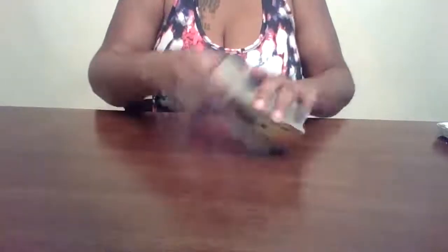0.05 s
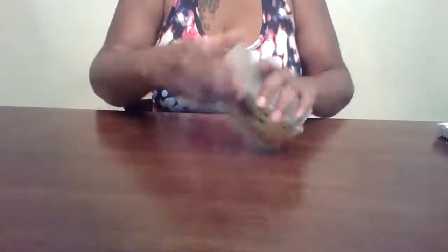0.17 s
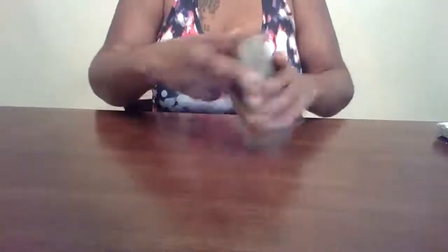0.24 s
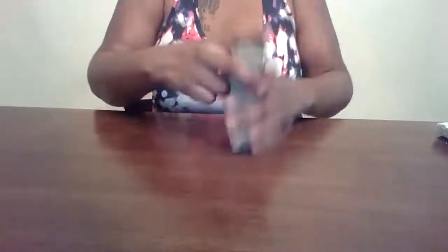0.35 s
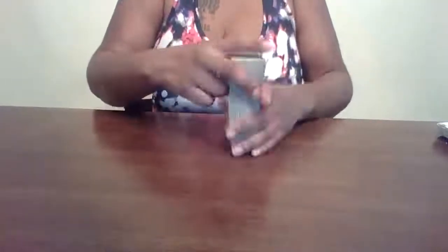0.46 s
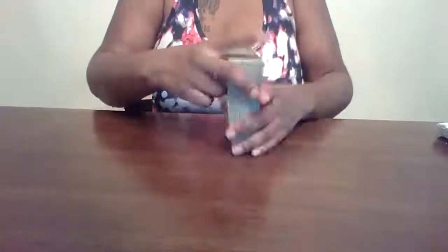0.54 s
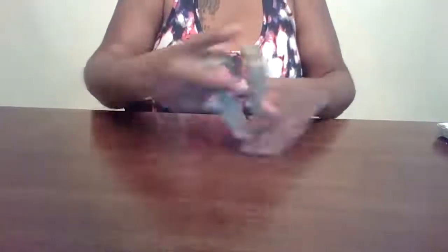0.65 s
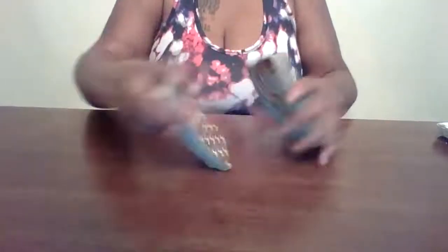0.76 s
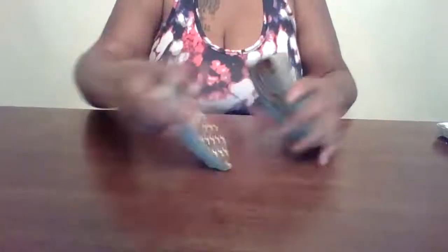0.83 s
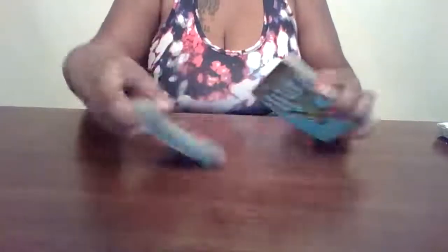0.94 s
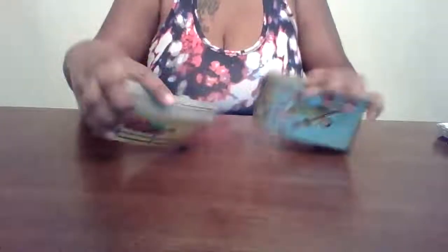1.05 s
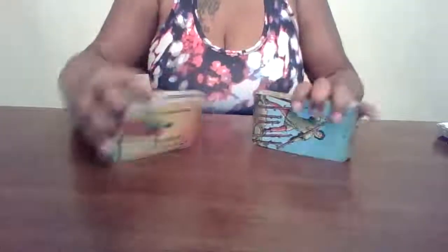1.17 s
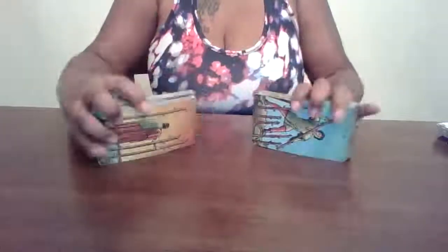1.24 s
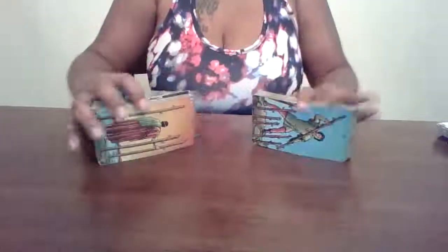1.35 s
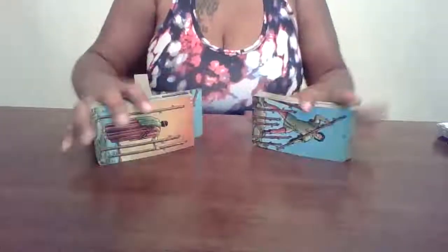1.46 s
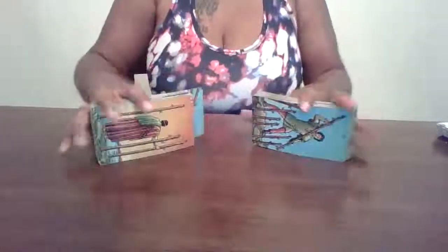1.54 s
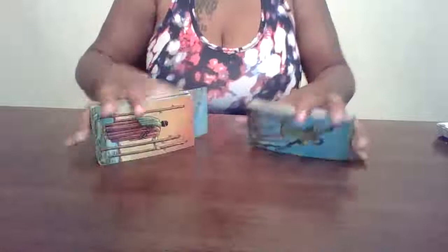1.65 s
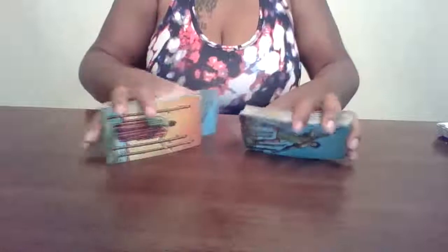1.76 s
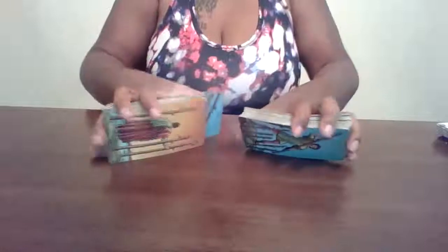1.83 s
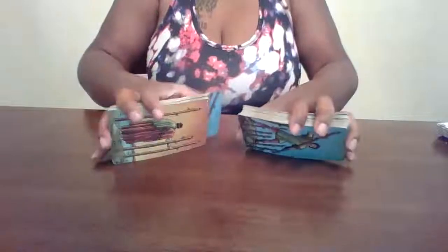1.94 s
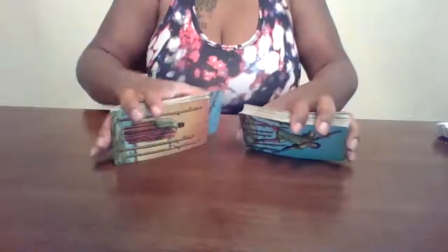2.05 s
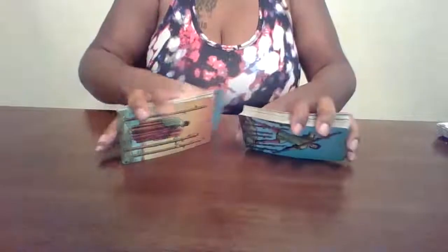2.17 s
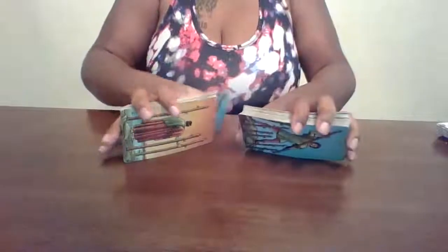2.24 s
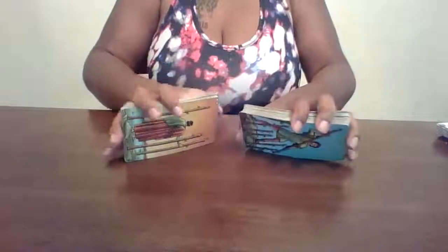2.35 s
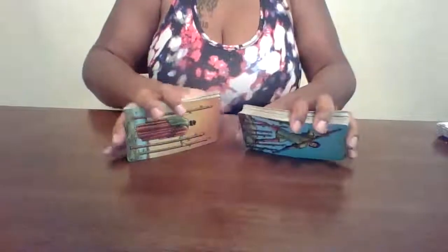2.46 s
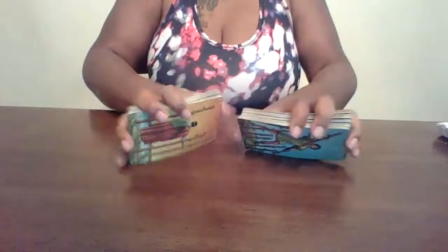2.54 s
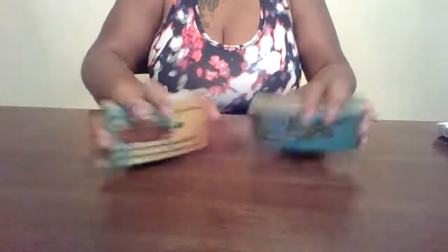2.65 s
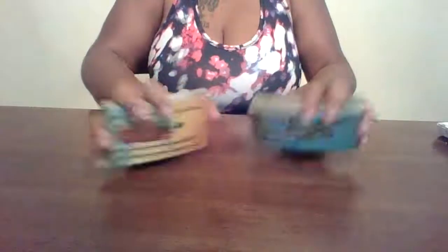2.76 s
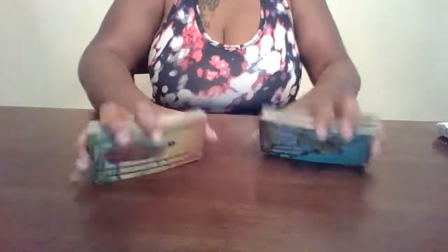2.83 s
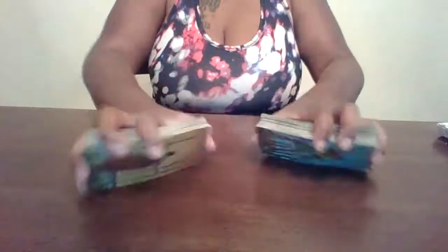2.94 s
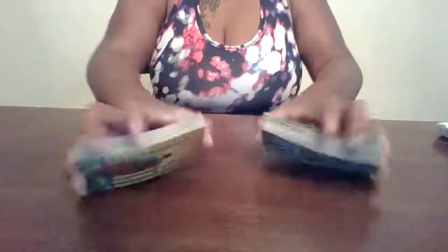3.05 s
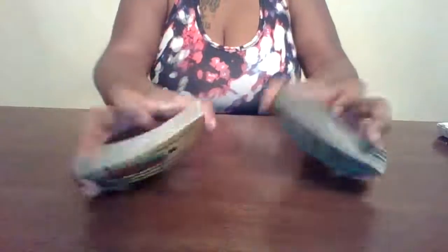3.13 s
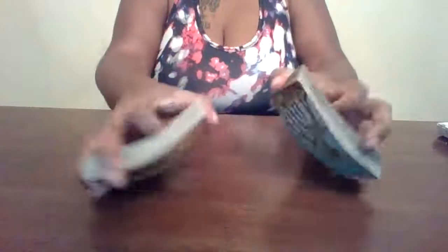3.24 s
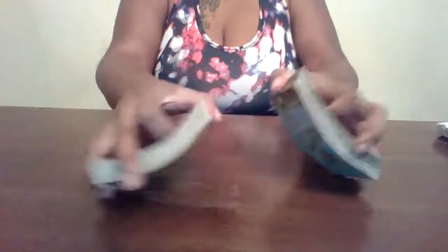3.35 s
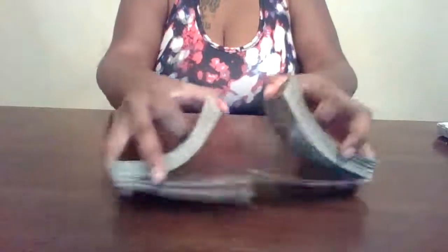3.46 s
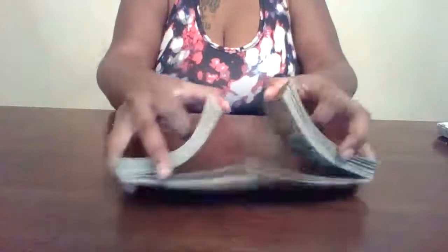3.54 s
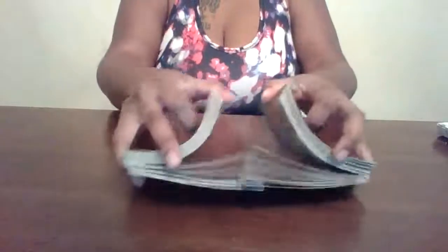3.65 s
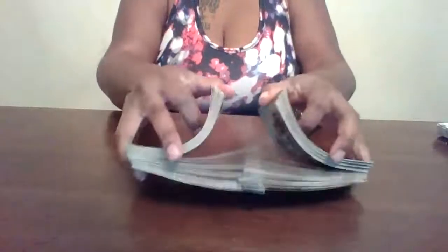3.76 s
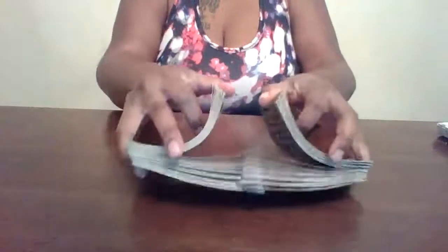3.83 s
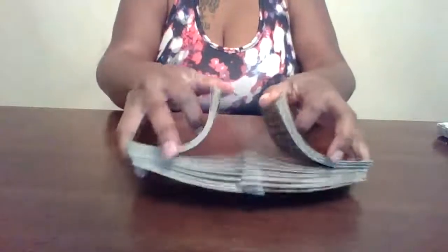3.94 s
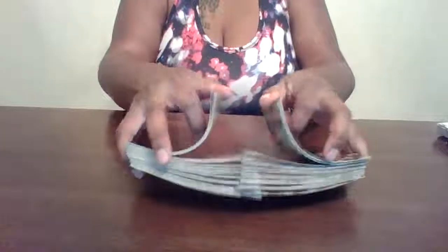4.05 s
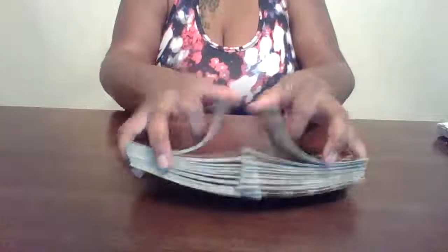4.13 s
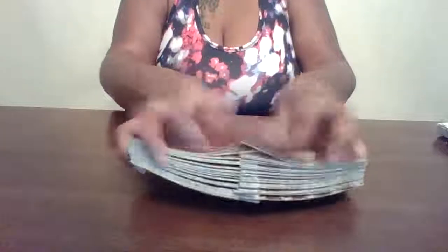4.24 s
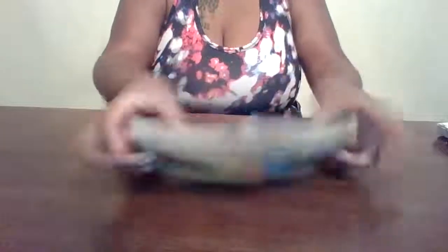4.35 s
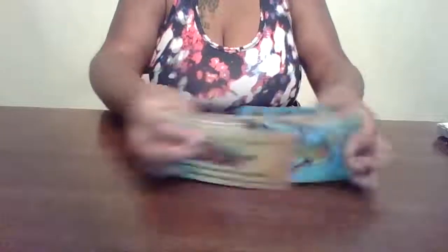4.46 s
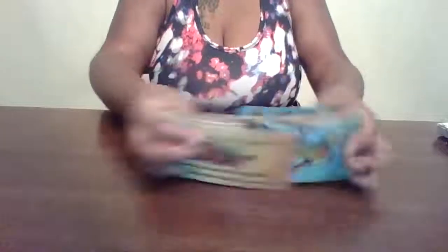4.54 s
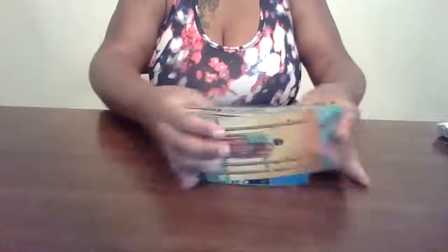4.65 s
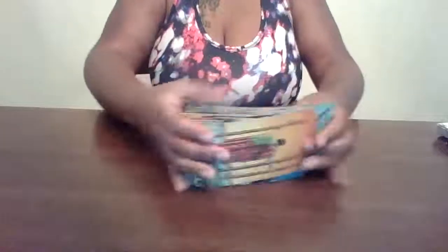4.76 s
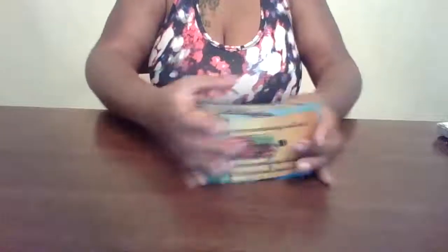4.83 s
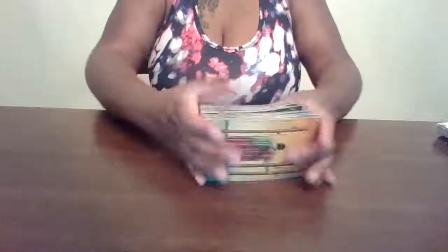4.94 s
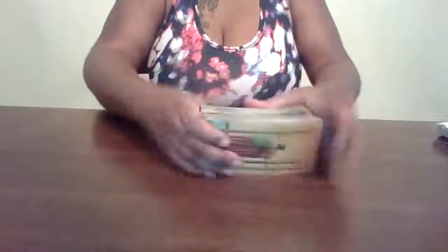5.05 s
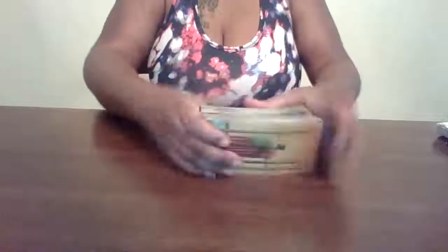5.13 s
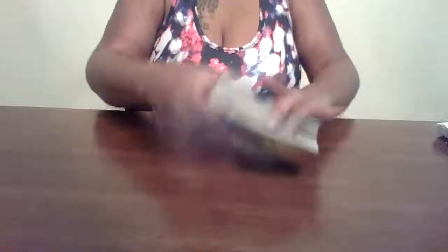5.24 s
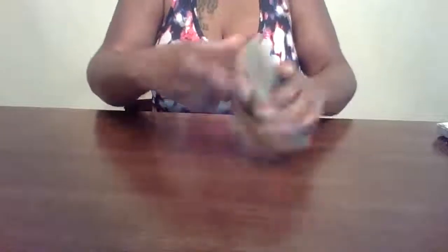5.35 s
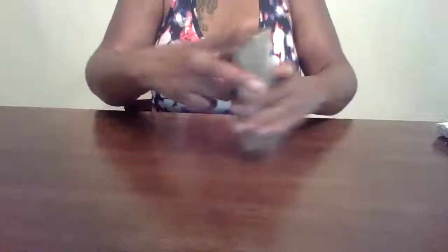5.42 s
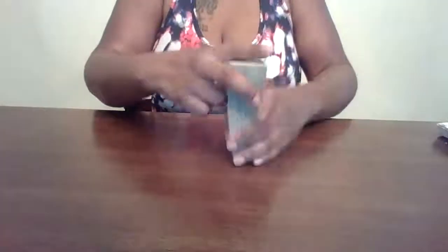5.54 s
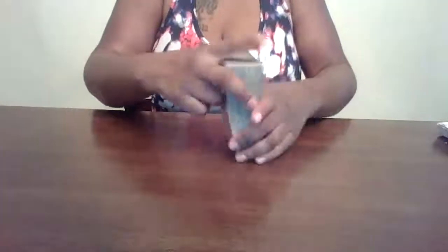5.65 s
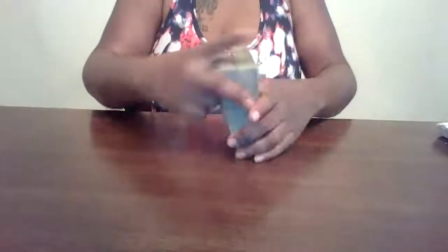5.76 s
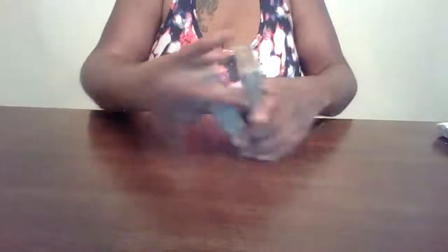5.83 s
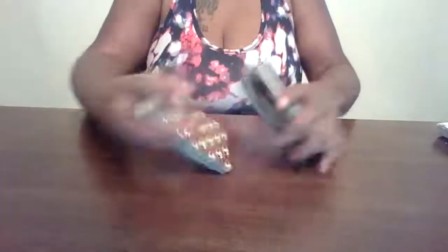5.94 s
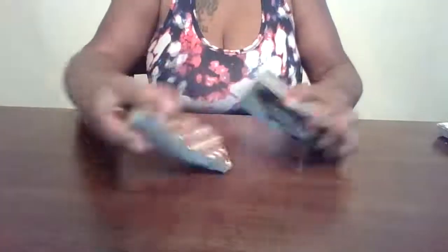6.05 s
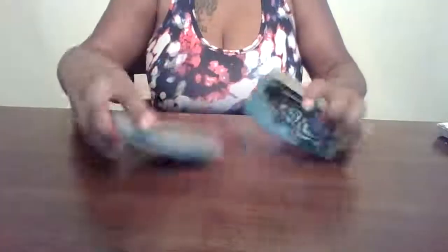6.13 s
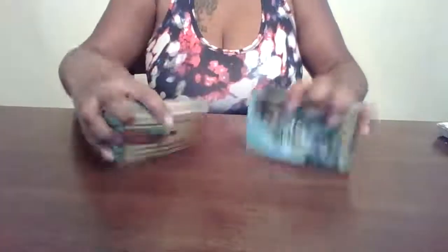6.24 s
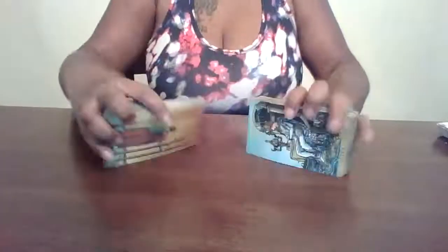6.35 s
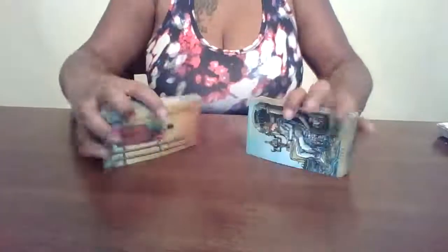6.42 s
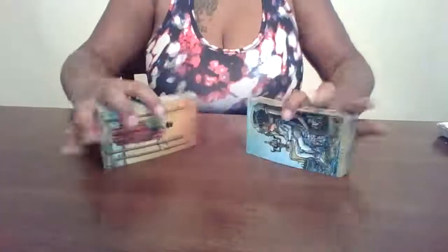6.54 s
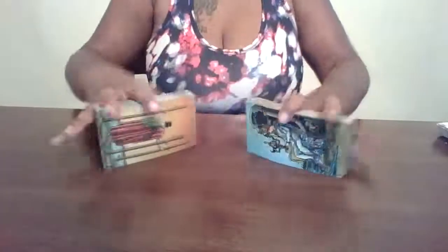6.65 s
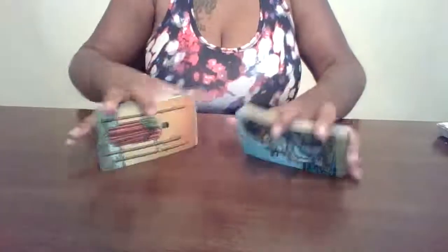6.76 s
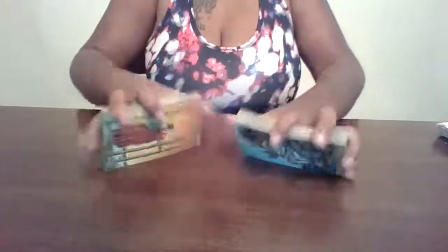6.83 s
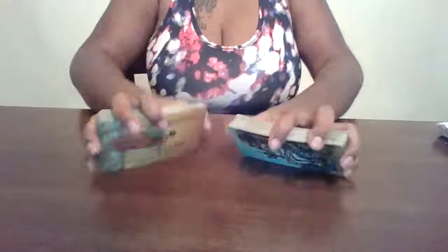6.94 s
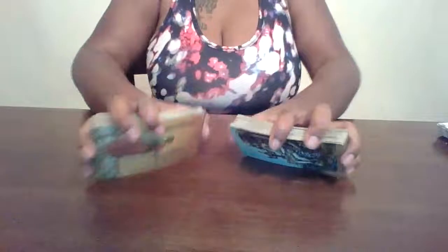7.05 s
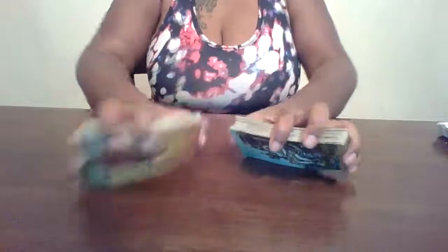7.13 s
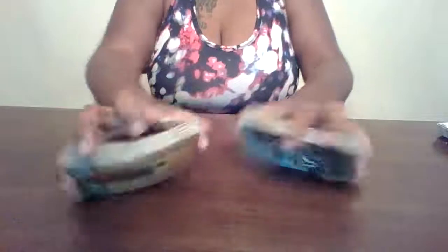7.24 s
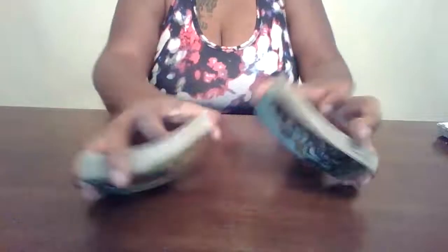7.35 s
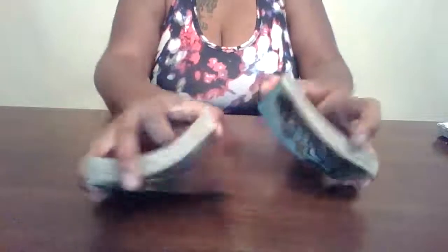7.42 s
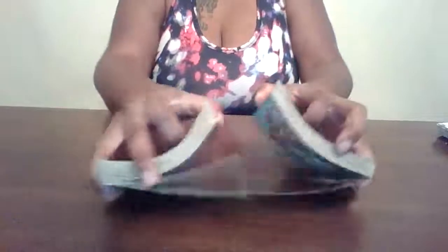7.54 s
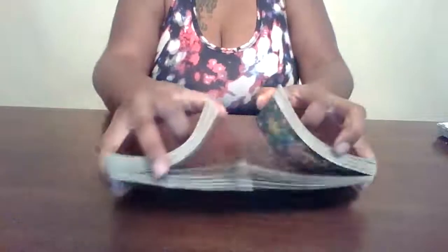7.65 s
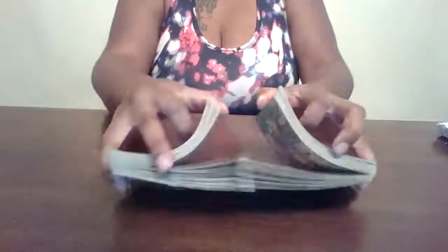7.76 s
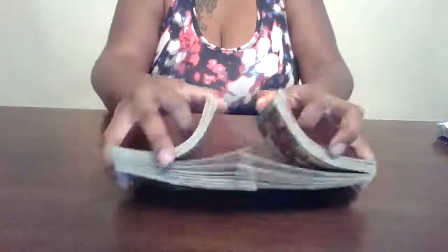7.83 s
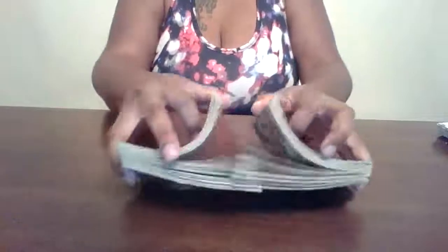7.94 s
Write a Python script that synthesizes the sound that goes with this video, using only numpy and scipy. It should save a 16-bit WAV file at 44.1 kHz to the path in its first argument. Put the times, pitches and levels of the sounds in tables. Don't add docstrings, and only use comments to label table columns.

```python
import sys
import numpy as np
from scipy import signal
from scipy.fft import rfft, irfft, next_fast_len
from scipy.io import wavfile
from scipy.ndimage import uniform_filter1d, minimum_filter1d

SR = 44100
rng = np.random.default_rng(int(sys.argv[2]) if len(sys.argv) > 2 else 0)


def put_to_file(sound):
    columns = np.atleast_2d(sound).T
    safe = np.clip(columns, -1, 1)
    whole_steps = np.round(safe * 32767)
    wavfile.write(sys.argv[1], SR, whole_steps.astype(np.int16))


def undo_db(level):
    steps = np.asarray(level, float) / 20
    return 10 ** steps


N = 352359

# start in seconds, slap level in dB,
# sharpness of the corner in dB, weight behind it in dB.
KNOCKS = [(0.3442, -22, -2.5, -0.5), (0.349, -25, -12, 0), (0.3553, -27.5, -2, 13.5), (0.7135, -61, -4, 19),
          (1.0763, -45, -17, 11.5), (1.1779, -35, -10, -1.5), (1.3883, -36, -16, -8),
          (1.3912, -24, -6.5, -12), (2.736, -35.5, -1.5, 8.5), (5.47, -13, -4.5, -16.5),
          (5.497, -28, 0.5, 11), (5.8802, -53.5, 11.5, 4), (6.269, -23.5, -7.5, 0.5),
          (6.292, -14.5, -11, -9), (6.441, -27.5, -24, -7), (6.4837, -34.5, -39, -17)]


def evened(x):
    return x / np.sqrt(np.mean(x ** 2) + 1e-20)


def read(points, hz):
    f, value = np.transpose(points)
    return np.interp(np.log(hz + 1), np.log(f + 1), value)


def follow(points):
    s, db = np.transpose(points)
    return undo_db(np.interp(np.arange(N) / SR, s, db, -120, -120))


def strokes(rows, steep_db):
    t = np.arange(N) / SR
    return sum(undo_db(db - steep_db * ((t - at) * 1000 / ms) ** 2) for at, db, ms, *_ in rows)


def colour(x, points):
    hz = abs(np.fft.fftfreq(4096, 1 / SR))
    log_gain = np.log(undo_db(np.maximum(read(points, hz), -100)))
    taps = np.fft.ifft(np.exp(np.conj(signal.hilbert(log_gain)))).real[:2048]
    return signal.oaconvolve(x, taps[None] / np.linalg.norm(taps), axes=1)[:, :N]


def resonate(x, hz, width):
    turn = np.exp(2j * np.pi * np.cumsum(hz * np.ones(x.shape[-1])) / SR)
    r = np.exp(-np.pi * width / SR)
    return 2 * (turn * signal.lfilter([1 - r], [1, -r], x / turn + 1e-18)).real


def noise(points, patchy_db, flicker_db):
    frames, hz = N // 128 + 5, np.fft.rfftfreq(512, 1 / SR)
    a, b, c, d, patches = rng.standard_normal((frames, len(hz), 5)).T
    patches = uniform_filter1d(patches, size=8, axis=0)
    patches = evened(uniform_filter1d(patches, size=14, axis=1))
    flicker = evened(uniform_filter1d(rng.standard_normal(frames), size=5))
    z = np.array([a + 1j * b, c + 1j * d]) * undo_db(patchy_db * patches + flicker_db * flicker)
    x = signal.istft(z, nperseg=512, noverlap=384)[1][:, :N]
    return evened(colour(x, points))


def contacts(rows, body, crack_hz, push_hz, rise, fizz_db, length_ms, dull_hz):
    s, slap_db, sharp_db, weight_db = np.transpose(rows)[:, :, None, None]
    crack_db, push_db = slap_db + sharp_db, slap_db + weight_db
    fizz_db = slap_db + fizz_db + 1.56 * sharp_db
    spread_db = 6.5 * np.clip(rng.standard_normal(s.shape), -2, .5)
    ms = length_ms * undo_db(spread_db - 0.41 * sharp_db)

    u = np.arange(1280) / SR / (np.maximum(ms, .3) / 1000)
    grit = rng.standard_normal((len(rows), 4, 3, u.shape[-1])).swapaxes(0, 1)
    grit = grit * np.exp(-u) * (1 - np.exp(-u / rise))
    grit = grit * (1 + 1.7 * np.exp(-u / 0.29))
    grit[:, :, 2] = signal.unit_impulse(u.shape[-1])
    crack, fizz, slap, push = grit

    crack = signal.sosfilt(signal.butter(2, [2900, crack_hz], "band", fs=SR, output="sos"), crack)
    fizz = signal.sosfilt(signal.butter(3, [7500, 16000], "band", fs=SR, output="sos"), fizz)
    modes = [undo_db(db) * resonate(resonate(slap, hz, width), hz, 3 * width) for hz, width, db in body]
    modes[0][:, 2] *= .25
    bend = sum(modes)
    puff = resonate(resonate(push, push_hz, 1500), push_hz, 1500)
    bend, puff = signal.sosfilt(signal.butter(3, dull_hz, fs=SR, output="sos"), [bend, puff])

    levels_db = crack_db - 6.0, fizz_db + 7.0, slap_db + 0.5, push_db + 6.0
    bursts = 0
    for layer, db in zip((crack, fizz, bend, puff), levels_db):
        layer = layer / np.linalg.norm(layer, axis=-1, keepdims=True)
        bursts = bursts + undo_db(db) * layer / abs(layer[:, :1]).max(-1, keepdims=True)
    out = np.zeros((3, N + u.shape[-1]))
    for at, burst in zip(np.round(s.ravel() * SR).astype(int) - 8, bursts):
        out[:, at:at + burst.shape[1]] += burst
    return out[:, :N]


def card_snaps():
    # start in seconds, slap level in dB, sharpness of the corner in dB,
    # weight of the card in dB.
    opening_riffle = [(3.2643, -47.5, 13, 0), (3.2896, -30.5, -1, 3.5), (3.2974, -27.5, 0.5, -5),
                      (3.3398, -41.5, -2, -15.5), (3.3487, -35.5, 5.5, 11), (3.3588, -43.5, -8.5, -1.5),
                      (3.366, -36, -1, 8), (3.374, -45, 11.5, 0.5), (3.3815, -44.5, 15, -6.5),
                      (3.3915, -22, 3, -7), (3.3962, -15.5, 7.5, -16), (3.4027, -9, -2, -11),
                      (3.4114, -24, 2, 6.5), (3.432, -33.5, 11, -11.5), (3.4704, -33.5, -8, -18.5),
                      (3.4842, -23, -5.5, -14), (3.4887, -24.5, 5.5, -6.5), (3.5034, -22.5, -2.5, -1.5),
                      (3.5308, -17.5, 2, -18.5), (3.5868, -47.5, 14, -9.5), (3.6177, -43.5, 2, -4.5),
                      (3.6322, -21.5, 5.5, -5),
                      (3.6619, -14.5, 4, -11.5), (3.671, -21, 11, -7), (3.6897, -21.5, 5.5, -4.5),
                (3.705, -21, 5.5, -5), (3.734, -52.5, 2.5, 8.5), (3.7464, -38, 8.5, 16),
                (3.768, -17, 9, -15.5), (3.7907, -18.5, 7.5, -5), (3.7996, -20, 15, -21),
                (3.8324, -13, 6.5, -25.5), (3.8686, -13.5, 6, -14.5), (3.891, -14, -3.5, -11),
                (3.8957, -24.5, -5.5, -22), (3.912, -40.5, 16.5, 2.5), (3.925, -11.5, 5, -23.5),
                (3.9371, -18, 6, 5.5), (3.9757, -35, 13, -7), (3.9841, -11, 12, -28),
                (3.9901, -26.5, 9, -11), (4.068, -14.5, 10, -36), (4.085, -13.5, 9, -24.5),
                (4.0928, -19, 11.5, -13.5), (4.1027, -11.5, 8.5, -5.5), (4.1193, -17.5, 6.5, -21)]
    second_riffle = [(7.29, -37.5, 0.5, 1), (7.353, -47.5, 20, 5), (7.3737, -44.5, -18, 4),
                     (7.4072, -49.5, 9.5, 3), (7.444, -44, 20.5, -2), (7.4606, -36.5, -7, 5),
                     (7.485, -61, 26, -0.5), (7.51, -43.5, 15, -13), (7.515, -26.5, 5, -3),
                     (7.5213, -20, -9, -8.5), (7.536, -27, -0.5, -1.5), (7.546, -30, 10.5, 2.5),
                     (7.565, -39, 13.5, -8), (7.5705, -19, 4.5, -11), (7.573, -11.5, -2.5, -16),
                     (7.577, -23, 3.5, -6), (7.581, -13, 4, -8.5), (7.628, -18, 7, -6),
                     (7.6627, -10.5, 5.5, -15), (7.717, -21.5, 11.5, -4.5), (7.7258, -23.5, 3, -14),
                     (7.7585, -16.5, -7, -10), (7.827, -38, 9, 7), (7.7687, -23.5, -7, -13),
                     (7.838, -14, -1.5, -9.5), (7.8485, -28, 11.5, 0.5), (7.851, -22.5, 0, 6),
                     (7.922, -54.5, 18.5, -7), (7.9339, -17.5, 0.5, -6.5), (7.9442, -15.5, -5, -7),
                     (7.9516, -11.5, 5.5, -11), (7.973, -13.5, 3, -12), (7.9854, -15, 5.5, -15)]
    # pitch in Hz, width in Hz, level in dB.
    bending = [(1560, 620, 9.5), (2060, 310, 2.5)]
    return contacts(opening_riffle + second_riffle, bending, crack_hz=7600, push_hz=580.0,
                    rise=0.0054, fizz_db=-15.0, length_ms=4.55, dull_hz=6100)


def card_rings():
    # start in seconds, corner level in dB, corner pitch in Hz,
    # face level above the corner in dB, face pitch in Hz.
    first_riffle = [(3.2984, -27, 2950, -9, 1500), (3.3474, -31, 3490, 13, 1220),
                    (3.3904, -18.5, 3030, -18, 1950), (3.4027, -11.5, 2760, -9.5, 1510),
                    (3.4316, -15, 3020, -11.5, 1520), (3.4845, -22.5, 3080, -3, 2160),
                    (3.53, -16, 3680, -3.5, 1680), (3.6336, -25, 2580, 9.5, 1640),
                    (3.6588, -19.5, 3030, -2.5, 1354), (3.6718, -13, 2540, -11, 2190),
                    (3.705, -18, 2520, -13, 2150), (3.7698, -18, 2440, -7, 1700),
                    (3.7978, -17, 2480, -17, 2280), (3.8325, -15.5, 4380, 10, 2060),
                    (3.8671, -14.5, 2520, -3.5, 1720), (3.8931, -11.5, 4280, -6, 2340),
                    (3.924, -5.5, 4500, 0.5, 2167), (3.9348, -18, 2530, 14, 939),
                    (3.9838, -8, 2500, -16.5, 2410), (3.9934, -6.5, 6160, -12.5, 1373),
                    (4.0677, -2.5, 2900, -18, 2150), (4.0845, -8, 8200, -7.5, 2123),
                    (4.1036, -6, 5460, -7, 1057), (4.1195, -1, 6160, -13, 1100)]
    second_riffle = [(7.446, -18.5, 6150, -15, 1460), (7.462, -19.5, 6800, -7, 1420),
                     (7.5138, -24, 5990, 4, 1610), (7.5227, -20, 3150, -7, 1340),
                     (7.5354, -18, 3240, -7, 1390), (7.5454, -26, 3200, 3, 1210),
                     (7.5734, -15.5, 2280, 5, 2200), (7.5806, -3, 4570, -11.5, 2080),
                     (7.6286, -10, 4520, -6, 1720), (7.661, -6.5, 4500, -7, 2143),
                     (7.7172, -13, 3750, -5.5, 2250), (7.7267, -17, 2400, 14, 2230),
                     (7.7587, -12, 4140, 2.5, 2150), (7.8371, -32, 2500, -9.5, 2140),
                     (7.8468, -21, 2440, -14.5, 1220), (7.8501, -17, 3990, -6, 1590),
                     (7.9322, -24, 2510, -8, 1600), (7.9431, -20.5, 2500, 2.5, 1440),
                     (7.9519, -1.5, 4400, -9, 1730), (7.9726, -16.5, 2780, -9, 1780),
                     (7.9854, -13.5, 4350, -4, 1680)]
    rows = first_riffle + second_riffle
    t, out = np.arange(512) / SR, np.zeros((2, N + SR))
    grits = rng.standard_normal((len(rows), 2, 2, len(t)))
    for (s, db, corner_hz, face_db, face_hz), grit in zip(rows, grits):
        corner = resonate(grit[0] * np.exp(-t / 0.00095), corner_hz, corner_hz / 6)
        face = resonate(grit[1] * np.exp(-t / 0.0013), face_hz, face_hz / 9)
        ring = corner / abs(corner).max(-1, keepdims=True)
        ring = ring + undo_db(face_db + 1.0) * face / abs(face).max(-1, keepdims=True)
        out[:, round(s * SR):][:, :len(t)] += undo_db(db - 5.5) * ring
    return out[:, :N]


def deck_knocks():
    # pitch in Hz, width in Hz, level in dB.
    wood = [(1380, 55, 17.5), (1950, 530, 8.5), (2920, 84, 8)]
    return contacts(KNOCKS, wood, crack_hz=6040, push_hz=556, rise=0.034,
                    fizz_db=-20.0, length_ms=6.9, dull_hz=4220)


def edge_ticks():
    # start in seconds, slap level in dB, sharpness in dB, weight in dB.
    catches = [(0.2334, -58, 26, 6), (0.857, -45, 2, -1), (1.115, -49, 12.5, 12), (1.9708, -68, 10, -16.5),
               (2.246, -56.5, 30.5, 9.5), (2.4383, -75, 9, 21), (2.776, -33, 2, 3), (3.1544, -45.5, 5.5, 6),
               (4.4023, -49, 20, 9), (4.4806, -50, -5, 15), (4.5431, -33.5, -2.5, -0.5),
               (4.58, -40, -15, -2), (4.635, -39, 4, -1), (4.711, -21.5, -6, -12), (4.7213, -23, -8, -14.5),
               (4.7942, -27.5, -6, -9), (4.8136, -27.5, -2, -5), (4.837, -28, -30, -12.5),
               (4.8581, -15.5, -3.5, -24), (4.951, -40, -8, -41), (5.9811, -49, 6, -10),
               (6.0373, -54, 15, 8), (6.053, -36, 5.5, -16), (7.097, -69, -8, 16), (7.212, -56, -0.5, 7)]
    # pitch in Hz, width in Hz, level in dB.
    card_edge = [(1400, 450, 7), (2150, 570, 2.5), (2930, 440, 0)]
    return contacts(catches, card_edge, crack_hz=5950, push_hz=795, rise=0.041,
                    fizz_db=-25.0, length_ms=4.8, dull_hz=4500)


def board_rings():
    # pitch in Hz, level in dB, time to fade by 60 dB in seconds.
    upper_modes = [(599, -8.5, 0.071), (1111, 2, 0.21), (1440, 12, 0.058), (1617, 8, 0.057),
                   (1920, -3.5, 0.018), (2370, -16.5, 0.046)]
    hz, mode_db, t60 = np.transpose(upper_modes)[:, :, None]
    out, t = np.zeros(N + SR), np.arange(SR // 2) / SR
    rings = undo_db(mode_db - 60 * t / np.clip(t60, .03, .11)) * np.sin(2 * np.pi * hz * t)
    rings = rings * (1 - np.exp(-t / 0.00174))
    places = rng.standard_normal((len(KNOCKS), len(upper_modes)))
    for (s, slap_db, *_), place in zip(KNOCKS, places):
        out[round(s * SR):][:len(t)] += undo_db(slap_db - 15.0 + 1.9 * place) @ rings
    return out[:N] * np.array([[1], [.4]])


def hard_blows():
    # pitch in Hz, level in dB, time to fade by 60 dB in seconds.
    spot_a = [(602, 2.5, 0.19), (544, 4.5, 0.23), (1016, -21, 0.25), (1100, 2.5, 0.2), (1408, 4.5, 0.087),
              (1720, -3, 0.11), (2150, -7.5, 0.19), (2250, 0.5, 0.052), (3100, -21.5, 0.12)]
    spot_b = [(433, -19, 0.077), (600, -6, 0.31), (835, -6, 0.099), (1127, -2, 0.12), (1250, 7, 0.063),
              (1362, -6, 0.094), (1680, 1, 0.065), (1896, 7.5, 0.044), (2310, -8, 0.048)]
    spot_c = [(420, -13.5, 0.21), (590, -5.5, 0.48), (1130, -10, 0.3), (1110, -16, 0.14), (1390, -8, 0.34),
              (1880, -2.5, 0.085), (2190, 3.5, 0.058), (2960, 3, 0.03), (3270, 0, 0.039),
              (4020, -4.5, 0.043)]
    spot_d = [(707, -8, 0.19), (1328, 8, 0.057), (1202, -1.5, 0.17), (1382, 3.5, .2), (1810, -5, 0.05),
              (1940, -35, 0.071), (2270, -11, 0.15), (3070, -48, 0.12)]
    # start in seconds, level in dB.
    hits = [(0.3556, -27.5), (1.0741, -48), (1.3909, -39), (2.7366, -34), (5.471, -21.5), (6.2686, -28),
            (6.293, -25.5), (6.4405, -40)]
    places = spot_a, spot_a, spot_d, spot_b, spot_c, spot_d, spot_d, spot_d
    out, t = np.zeros(N + SR), np.arange(SR // 2) / SR
    for (s, db), modes in zip(hits, places):
        hz, mode_db, t60 = np.transpose(modes)[:, :, None]
        rings = undo_db(mode_db - 60 * t / np.clip(t60, .025, .18)) * np.sin(2 * np.pi * hz * t)
        out[round(s * SR):][:len(t)] += undo_db(db) * rings.sum(0) * (1 - np.exp(-t / 0.0014))
    return out[:N] * np.array([[1], [.4]])


def table_boom():
    # pitch in Hz, level in dB, time to fade by 60 dB in seconds.
    low_modes = [(69.1, -1, 0.54), (138.8, -13, 0.44), (192.4, -12, 0.15), (211, -8.5, 0.18),
                 (226.3, -11.5, 0.33), (262.5, -11, 0.35), (292, -13.5, 0.32), (329, -25.5, 0.45),
                 (490, -13.5, 0.071), (527, -27, 0.12)]
    # start in seconds, boom level in dB, overtones above the boom in dB.
    thumps = [(0.061, -46.5, -11), (0.355, -18, 7.5), (0.702, -36, 6.5), (1.074, -29, 5.5), (1.39, -47, 5),
              (2.36, -54, 11), (2.56, -45, -20.5), (2.732, -31.5, 11.5), (3.053, -47, -8), (3.29, -37, 8.5),
              (3.4, -31.5, 6.5), (3.628, -48, 18), (3.772, -32.5, 7), (3.866, -29, -1), (3.982, -26.5, 5),
              (4.071, -37, -28), (4.271, -38.5, -31), (4.397, -36.5, 8), (4.708, -48.5, 16.5),
              (5.476, -25.5, 14), (5.88, -35, 3), (6.048, -28.5, -13), (6.269, -28, 10.5),
              (6.842, -51, 13.5), (7.19, -37.5, -15), (7.526, -39, 1), (7.658, -36.5, -2),
              (7.835, -30.5, 7.5), (7.948, -43, -3)]
    hz, mode_db, t60 = np.transpose(low_modes)[:, :, None]
    out, t = np.zeros(N + SR), np.arange(SR) / SR
    rings = undo_db(mode_db - 60 * t / t60) * np.sin(2 * np.pi * hz * t) * (1 - np.exp(-t / 0.0074))
    for s, db, overtone_db in thumps:
        place_db = overtone_db - 0.5 + 2.0 * rng.standard_normal(len(low_modes))
        out[round(s * SR):][:SR] += undo_db(db + (hz[:, 0] > 100) * place_db) @ rings
    return out[:N] * np.array([[.85], [-.45]])


def sliding_cards(bright):
    # time in seconds, effort in dB.
    slide = [(0, -60), (.27, -81), (.48, -54.5), (.89, -69), (1.24, -59.5), (1.5, -57.5), (1.96, -71),
             (2.72, -77), (2.91, -59.5), (3.22, -85.5), (4.27, -59.5), (4.9, -48.5), (5.4, -76.5),
             (5.63, -57.5), (5.9, -64.5), (6.43, -63.5), (6.7, -64), (7.4, -73)]
    # time in seconds, drag in dB.
    drags = [
        [(3.25, -102), (3.45, -42.5), (3.55, -56), (3.71, -40.5), (3.96, -38.5), (4.16, -35.5), (4.27, -57.5),
         (4.6, -68), (5.2, -81)],
        [(7.4, -100), (7.54, -57), (7.62, -45.5), (7.72, -43.5), (7.83, -46), (7.99, -57)],
        [(4.69, -74.5), (4.73, -49.5), (4.9, -79), (5.1, -70)],
    ]
    # middle in seconds, level in dB, length in ms, gap pitch in Hz.
    scrapes = [(1.45, -56, 66, 1950), (4.411, -45, 13, 1490), (4.496, -42, 9.3, 1190),
               (4.55, -41, 49, 1200), (4.718, -36, 28, 1420), (4.84, -42.5, 77, 1500),
               (4.99, -46.5, 6.4, 450), (5.004, -47, 9, 1460), (5.025, -38, 15.2, 750),
               (5.047, -45.5, 15, 720)]
    # frequency in Hz, level in dB per Hz.
    scuff_colour = [(120, -34), (200, 3.5), (436, -14), (465, -8.5), (762, -10), (1020, -7), (1190, -2),
                    (2770, -17.5), (9000, -24), (11700, -69.5)]
    t = np.arange(N) / SR
    slide_db = np.interp(t, *np.transpose(slide))
    drag = sum(follow(curve) for curve in drags)
    hiss = undo_db(-52.5 + 0.3 * slide_db) + drag
    scuff = undo_db(slide_db) + undo_db(-7) * drag
    grain = noise(scuff_colour, 2.0, 2.0)
    s, *_, gap_hz = np.transpose(scrapes)
    gap = np.interp(t, s, gap_hz)
    scrape = strokes(scrapes, 20.0) * evened(resonate(resonate(bright, gap, 420), gap, 900))
    dull = evened(signal.lfilter(*signal.butter(2, 7000, fs=SR), bright))
    jerks = evened(uniform_filter1d(rng.standard_normal(N), size=260))
    stutter = evened(undo_db(3.0 * jerks))
    return stutter * (hiss * dull + scrape) + scuff * grain


def swishes_and_flicks(bright):
    # middle in seconds, level in dB, length in ms.
    swishes = [(0.062, -72, 60), (0.792, -53, 13), (0.859, -57.5, 43), (1.82, -63, 57), (1.969, -54.5, 13),
               (2.548, -60.5, 46), (4.289, -48.5, 39), (4.502, -48, 55), (5.005, -47.5, 30),
               (5.425, -68, 13), (5.984, -58, 14), (6.992, -54.5, 97)]
    flicks = [(2.2487, -44, 1.2), (3.2645, -42.5, 3.2), (3.339, -36.5, 1.7), (3.4712, -30, 1.2),
              (3.618, -36, 2.2), (6.039, -46, 1.5), (6.044, -48, 18)]
    skin = evened(signal.lfilter(*signal.butter(1, 5000, fs=SR), bright))
    whip = evened(np.gradient(bright, axis=1))
    return strokes(swishes, 21.4) * skin + strokes(flicks, 8.4) * whip


def rubbing():
    # frequency in Hz, level in dB per Hz.
    rub_colour = [(1470, -6), (2500, -3.5), (3510, -6.5), (6200, -5.5), (10800, -5), (12300, 1.5),
                  (15200, 8.5), (16500, -62)]
    bright = noise(rub_colour, 2.0, 3.2)
    return sliding_cards(bright) + swishes_and_flicks(bright)


def leaning_arms():
    # time in seconds, weight in dB.
    lean = [(0.0, -59), (0.27, -89), (0.35, -41.5), (1.76, -55.5), (2.69, -69.5), (2.74, -50), (3.25, -59),
            (4.05, -41.5), (5.27, -58), (5.54, -59), (5.7, -83), (5.87, -48.5), (6.34, -44), (6.81, -59.5),
            (6.85, -41.5), (7.37, -55), (7.59, -50), (7.99, -53.5)]
    sway = resonate(resonate(rng.standard_normal((2, N)), 28, 45), 28, 45)
    return follow(lean) * evened(sway)


def wall_echo(snaps):
    delay = round(0.0062 * SR)
    scatter = rng.standard_normal((2, 256)) * np.hanning(256)
    scatter = scatter / np.linalg.norm(scatter[0])
    out = np.zeros((2, N))
    out[:, delay:] = undo_db(-9.5) * signal.oaconvolve(snaps[1::-1], scatter, axes=1)[:, :N - delay]
    return out


def room(x):
    # frequency in Hz, time to fade by 60 dB in seconds.
    fading = [(60, 0.92), (160, 0.93), (420, 0.51), (1100, 0.65), (2910, 0.51), (7680, 0.5), (14000, 0.15)]
    tone = [(200, 2.5), (1800, 2.0), (2200, -3.0), (2650, -3.0), (3100, -2.0), (6000, 1.5), (14000, 3.0)]  # Hz, dB
    taps = np.zeros((2, SR))
    at = np.arange(300, SR - 20, 20) + rng.integers(0, 20, (2, (SR - 301) // 20))
    np.put_along_axis(taps, at, rng.choice([-1., 1.], at.shape), 1)
    hz, t, z = signal.stft(taps, SR, nperseg=256)
    z = z * undo_db(-60 * t / read(fading, hz)[:, None] + read(tone, hz)[:, None])
    tail = signal.istft(z, SR, nperseg=256)[1]
    return signal.fftconvolve(x[None], tail / np.linalg.norm(tail[0]), axes=1)[:, :N]


def still_air():
    # frequency in Hz, level in dB per Hz.
    air_colour = [(12, -21), (20, 5), (51, -2.5), (465, -24), (670, -22), (939, -46.5), (1390, -28),
                  (3330, -43), (11500, -31), (15750, -30.5), (16500, -47.5)]
    return undo_db(-60) * noise(air_colour, 4.1, 3.1)


def scene():
    # frequency in Hz, level in dB.
    apart = [(60, -10), (200, -14), (500, -15), (1300, -12), (2400, -6.5), (5000, -6), (9000, -1),
             (11500, -5), (13000, -13), (16000, -13)]
    snaps, rings = card_snaps(), card_rings()
    knocks, ticks = deck_knocks(), edge_ticks()
    to_walls = undo_db(-11.0) * snaps[2] + undo_db(-10.0) * knocks[2] + undo_db(-9.0) * ticks[2]
    wet = room(to_walls + undo_db(-14.5) * rings[0]) + wall_echo(snaps)
    cards = snaps[:2] + rings + ticks[:2] + rubbing()
    wood = knocks[:2] + board_rings() + hard_blows() + table_boom() + leaning_arms()
    shared, other = cards + wood + wet + still_air()
    size = next_fast_len(N)
    gain = undo_db(read(apart, np.fft.rfftfreq(size, 1 / SR)))
    other = irfft(rfft(other, size) * gain, size)[:N]
    return np.array([shared + other, shared - other])


def band_limit(x):
    return signal.sosfilt(signal.butter(12, 16800, fs=SR, output="sos"), x)


def record(dry):
    # start in seconds, end in seconds.
    dulled = [(.66, .88), (1.63, 1.72), (2.52, 2.63), (2.87, 3.0), (4.03, 4.055), (4.33, 4.38), (5.05, 5.2),
              (5.9, 6.03), (6.075, 6.11), (6.195, 6.34), (6.53, 6.57), (6.86, 7.17), (7.2, 7.33),
              (7.685, 7.71)]
    edge_hz = 15900
    t = np.arange(N) / SR
    dry = signal.oaconvolve(dry, signal.firwin(401, 16800, window=("kaiser", 8), fs=SR)[None], "same")
    lost = uniform_filter1d(sum((t > a) & (t < b) for a, b in dulled) * 1., size=512)
    top_taps = signal.firwin(401, [12100, edge_hz], pass_zero=False, fs=SR)
    top = signal.oaconvolve(dry, top_taps[None], "same")
    edge_taps = signal.firwin(401, edge_hz, pass_zero=False, fs=SR)
    edge = signal.oaconvolve(dry, edge_taps[None], "same")
    power = (top ** 2).mean(0)
    usual = uniform_filter1d(power, size=4096)
    calm = uniform_filter1d(power, size=64) < undo_db(19) * usual + 3e-6
    calm = uniform_filter1d(minimum_filter1d(calm * 1., size=256), size=64)
    return band_limit(np.clip(dry - lost * top - calm * edge, -1, 1))


dry = scene()
out = record(dry)
put_to_file(out)
```